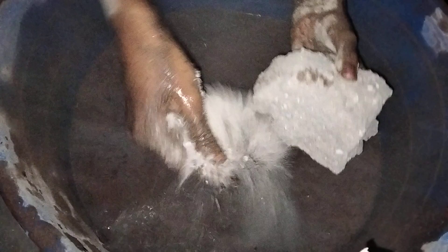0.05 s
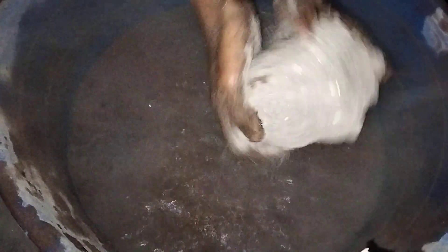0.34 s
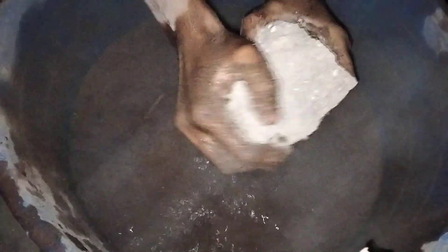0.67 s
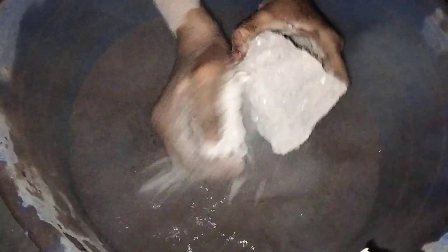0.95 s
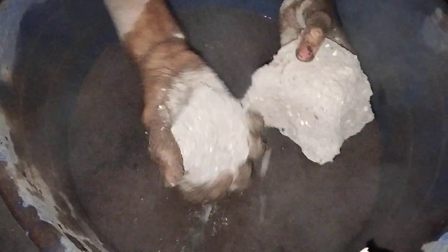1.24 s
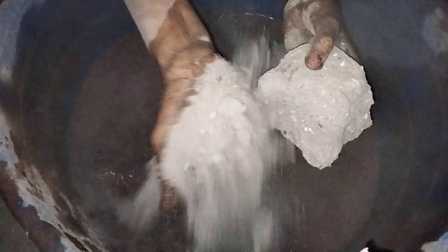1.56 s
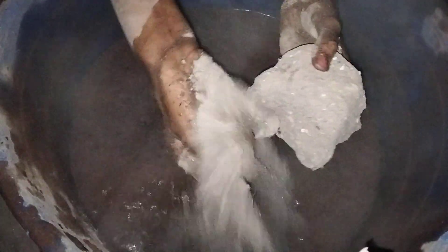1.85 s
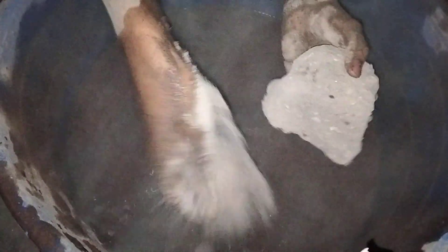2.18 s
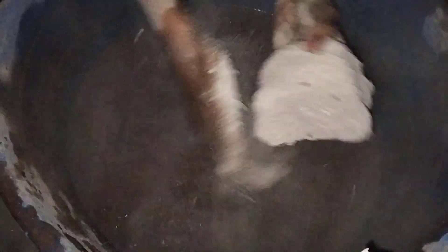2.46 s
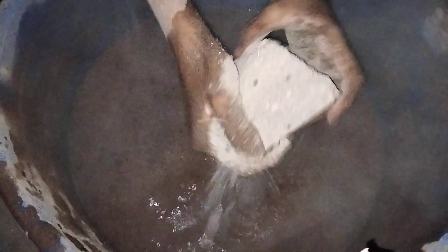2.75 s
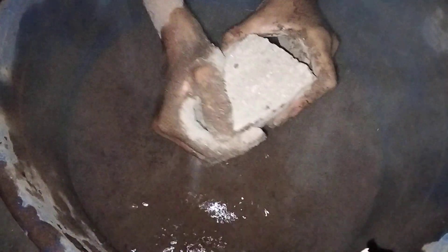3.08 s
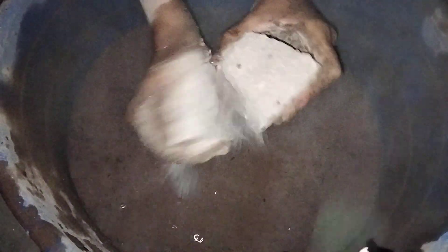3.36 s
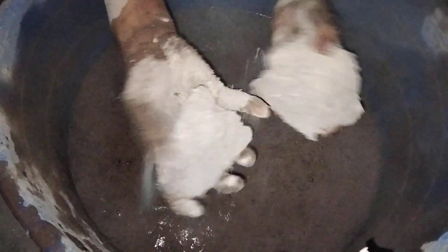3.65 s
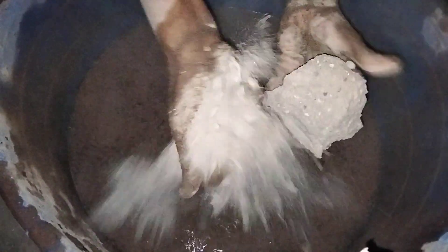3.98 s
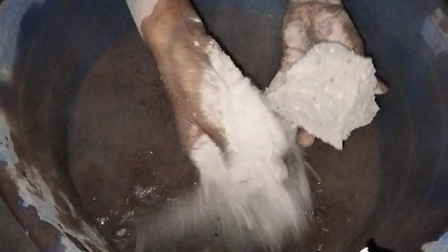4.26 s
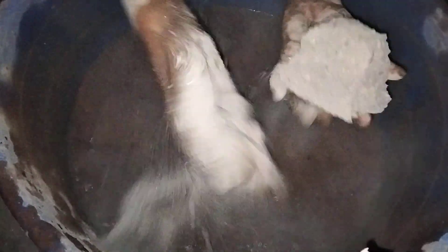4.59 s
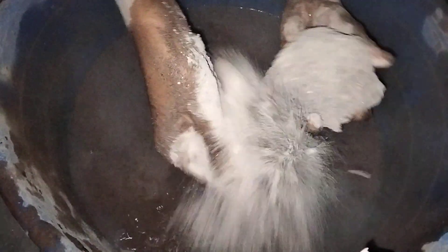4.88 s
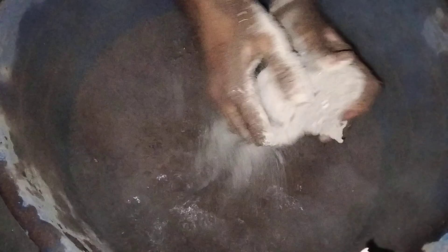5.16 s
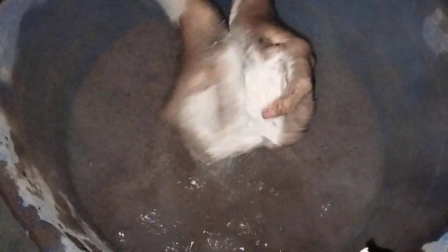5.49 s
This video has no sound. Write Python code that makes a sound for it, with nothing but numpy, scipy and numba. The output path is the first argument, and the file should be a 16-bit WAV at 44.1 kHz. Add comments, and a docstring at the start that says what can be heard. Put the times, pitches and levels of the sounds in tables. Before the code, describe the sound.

A hand crumbles a dry chunk of sand and cement over a plastic tub with a little water in it, close to the microphone. It opens with gritty crunches and falling crumbs for half a second. Fingers then rasp softly over the chunk, and a very faint, distant tone wavers around 0.7 to 1 second. From about 1.2 to 2.5 seconds comes dense crackling with bright snaps and a powdery hiss. Sand patters into the wet tub, lumps land with ticks and short plinks, and handfuls thud softly, ringing the hollow, most clearly near 1.6 seconds. Quieter rubbing and stray crumbs follow until 3.6 seconds. Another long round of crushing and spilling runs to about 5.1 seconds, with a soft thud near 4.8. Light rubbing and a few last plinks close it by 5.6 seconds. A steady low rumble lies underneath throughout.

```python
"""A dense, dry crackle, close to the microphone: a hand crushes a chunk of sand and cement over a
plastic tub with a little water in it. Grain bonds break and fingers rasp over the chunk. Sand patters
into the wet tub, lumps land with a tick and a short plink of trapped air, and handfuls thud on the
bottom, all ringing the tub's hollow. A low rumble lies underneath, with one faint, far, wavering tone."""
import sys
import numpy as np
from scipy import signal
from scipy.fft import rfft, irfft
from scipy.io import wavfile
from scipy.ndimage import uniform_filter1d
from numba import njit

SR = 44100
rng = np.random.default_rng(int(sys.argv[2]) if len(sys.argv) > 2 else 0)


def put_to_file(sound):
    """Save the sound as 16-bit audio at rate SR, in the file named by the first command-line argument."""
    columns = np.atleast_2d(sound).T  # one column per channel
    safe = np.clip(columns, -1, 1)
    whole_steps = np.round(safe * 32767)
    wavfile.write(sys.argv[1], SR, whole_steps.astype(np.int16))


N = 248283
TIME = np.arange(N) / SR
TOP_HZ = 15700
RUB_RELEASE_DB_PER_S = 429

# fingers rubbing the chunk as they shift their grip: start_s, length_s, level_db
FINGER_RUBS = [(.565, 0.098, -53.5), (.74, 0.03, -45), (.818, 0.01, -47.5), (.85, 0.074, -47.5),
               (.95, 0.064, -52), (1.15, 0.11, -51), (2.65, 0.076, -55.5), (2.74, 0.025, -47.5),
               (3.0, 0.016, -49.5), (3.192, 0.021, -47.5), (3.3, 0.077, -48.5), (3.385, 0.069, -48.5),
               (3.46, 0.22, -55.5), (4.15, 0.045, -43), (4.58, 0.11, -48.5), (5.12, 0.057, -54.5),
               (5.2, 0.046, -51), (5.312, 0.025, -49), (5.375, 0.024, -44), (5.42, 0.029, -51),
               (5.53, 0.082, -52.5)]
# spectrum of sand striking the wet plastic: frequency_hz, level_db
SAND_SPECTRUM = [(100, -28.5), (300, -4.5), (480, 0.5), (620, 3), (930, -5), (1350, 1.5), (1800, -9),
                 (3000, -3), (8000, -25)]


def crumbling(crush_db, count=15000, low_hz=1200, ring_s=0.0025, bonds_db=-2, powder_db=-10):
    """Each grain that breaks loose pings at its own pitch; bonds crackle and the powder hisses."""
    # spectrum of the breaking grit: frequency_hz, level_db
    grit_spectrum = [(200, 8.5), (600, -7), (1500, -8.5), (2300, 3.5), (3000, 5.5), (3900, 5.5), (4700, -1),
                     (7000, -3.5), (9000, -1), (11000, 1), (12500, -5.5), (15000, -16.5)]
    when, pitch, length = rng.random((count, 3)).T
    hz = low_hz + (TOP_HZ - low_hz) * pitch
    size = undb(6 * np.minimum(rng.standard_normal(count), 2.5))
    pings = unit(plinks(when * N / SR, hz, ring_s * hz * (0.55 + length), size, rise=0.))
    breaks_per_s = 2600 * undb(0.71 * (crush_db - crush_db.mean()))  # faster under a harder squeeze
    bonds = unit(shower(breaks_per_s, spread_db=5.1))
    powder = rng.standard_normal(N)
    grains = pings + undb(bonds_db) * bonds + undb(powder_db) * powder
    grit = through(grains * slips(), click(grit_spectrum))
    return unit(grit, band_hz=(5000, 15000)) * undb(crush_db)


def hand(fall_s=0.0029, rub_spill_db=-9.5, idle_grit_db=-79, idle_sand_db=-64.5):
    """The fist crumbles the chunk and spills sand: the levels of both over time, in dB."""
    # squeezes of the fist: start_s, length_s, crush_db, land_db
    squeezes = [(-.01, 0.031, -40.5, -40.5), (0.156, 0.078, -43.5, -44.5), (0.376, 0.051, -50, -50),
                (1.255, 0.077, -43, -46), (1.362, 0.095, -44.5, -42.5), (1.483, 0.12, -41, -39.5),
                (1.7, 0.25, -45.5, -44.5), (1.886, 0.17, -45.5, -46), (2.1, 0.13, -45, -42.5),
                (2.216, 0.0076, -38.5, -34), (2.341, 0.14, -46.5, -50), (3.621, 0.005, -49, -40.5),
                (3.647, 0.22, -42.5, -48.5), (3.86, 0.074, -51, -48.5), (3.946, 0.085, -40.5, -44.5),
                (4.186, 0.18, -42, -40.5), (4.409, 0.055, -41.5, -40.5), (4.673, 0.13, -46, -43.5),
                (4.857, 0.16, -49, -48.5)]
    start, length, crush_db, land_db = np.transpose(squeezes)
    rubbing = strokes(FINGER_RUBS, RUB_RELEASE_DB_PER_S)
    crushing = strokes(zip(start, length, crush_db), release_db_per_s=125.5)
    sifting = strokes(zip(start, length, crush_db - 3), release_db_per_s=27.5)  # powder lingers
    landing = strokes(zip(start + fall_s, length, land_db), release_db_per_s=105)
    grit = crushing + crunches() + sifting + rubbing + undb(idle_grit_db) ** 2
    sand = landing + rubbing * undb(rub_spill_db) ** 2 + undb(idle_sand_db) ** 2
    return 10 * np.log10(grit), 10 * np.log10(sand)


def strokes(rows, release_db_per_s, attack_s=0.001, build_share=0.27, sag_db_per_s=16, brief_s=0.06):
    """Power of hand strokes: each swells with the pressure, sags as the piece gives way and dies off."""
    power = 0
    for start, length, db in rows:
        age = np.maximum(TIME - start, 0)
        swell = np.minimum(age / (attack_s + build_share * length), 1)
        haste = max(brief_s / length, 1)  # brief strokes die off faster
        lost_db = sag_db_per_s * age + release_db_per_s * np.maximum(age - length, 0) * haste
        power = power + (swell * undb(db - lost_db)) ** 2
    return power


def crunches(hold_s=0.001, decay_db_per_s=1113):
    """Power of grain patches giving way at once: a sudden start, a short hold, a quick decay."""
    # collapsing patches: start_s, level_db
    patches = [(.002, -40), (0.237, -35), (0.956, -48), (1.125, -43), (1.171, -43), (1.276, -35),
               (1.300, -37.5), (1.426, -42), (1.465, -35.5), (1.831, -36), (2.78, -42.5), (3.029, -49.5),
               (3.22, -46), (3.33, -44), (3.713, -57), (3.781, -35), (3.962, -46), (4.009, -39),
               (4.221, -45), (4.268, -53), (4.298, -41), (4.406, -37), (4.505, -36), (4.895, -47),
               (5.021, -38.5), (5.065, -40.5)]
    power = 0
    for start, db in patches:
        lost_db = decay_db_per_s * np.maximum(TIME - start - hold_s, 0)
        power = power + (TIME >= start) * undb(db - lost_db) ** 2
    return power


def snaps(crack_db=-7.5, ping_db=-4.5, ring_s=0.0024):
    """Larger bonds give way with a bright crack, and the loosened chip pings."""
    # dry snaps of the chunk: start_s, level_db, pitch_hz
    breaks = [(0.06, -9.5, 9450), (0.2702, -6.5, 7700), (0.4645, -16.5, 3300), (0.51, -16, 2770),
              (.5878, -19.5, 2780), (0.9055, -19, 3584), (0.9747, -22, 6800), (1.1261, -18.5, 3450),
              (1.6374, -14, 7200), (1.6646, -9.5, 4600), (1.6921, -10.5, 8500), (1.7841, -10, 3860),
              (2.073, -17.5, 8300), (2.223, -7, 3800), (2.233, -7, 2430), (2.2896, -14, 7950),
              (2.3152, -10.5, 3700), (2.3209, -9.5, 6000), (2.3502, -13, 10800), (2.5543, -16.5, 6100),
              (2.8173, -21.5, 10000), (3.584, -26, 10900), (3.694, -17, 10700), (3.9105, -16, 3980),
              (4.0802, -11, 4000), (4.1121, -15.5, 3650), (4.1691, -15, 10150), (4.3296, -14, 9400),
              (4.424, -7.5, 10700), (4.4872, -7, 3300), (4.5118, -14.5, 7040), (4.631, -18.5, 3300),
              (4.663, -12, 11500), (4.768, -13, 9800), (4.95, -20, 6140), (4.9732, -16, 6900),
              (5.0385, -20.5, 3510)]
    # spectrum of a crack: frequency_hz, level_db
    crack_spectrum = [(200, -17), (1000, 11), (3500, 11), (5000, 14), (7500, 11), (11000, 18), (13000, 2.5),
                      (15500, -2)]
    when, db, hz = np.transpose(breaks)
    crack = through(shatter(when, db + crack_db, debris_db=-19, t60=0.025), click(crack_spectrum))
    return crack + plinks(when, hz, ring_s * hz, undb(db + ping_db), rise=0.)


def rasp(band_hz=(2900, 3800), gain_db=-6):
    """Skin dragged over the grains sticks and slips in a soft, narrow rasp."""
    band = signal.butter(2, band_hz, "band", fs=SR)
    drag = unit(signal.lfilter(*band, shower(5000, spread_db=3)) * slips())
    return drag * np.sqrt(strokes(FINGER_RUBS, RUB_RELEASE_DB_PER_S)) * undb(gain_db)


def lumps(plink_db=5.5, knock_db=-15, crumb_db=-6, crumbs=3, scatter_s=0.012):
    """A lump slaps and knocks the wet bottom and traps a pocket of air; its crumbs plink around it."""
    # lumps landing in the tub: start_s, tick_db, pitch_hz, ring_db
    landings = [(.0296, -29, 2200, -31), (.082, -23, 1970, -35.5), (0.139, -21, 2070, -35),
                (0.1755, -16.5, 2650, -36), (.2612, -24, 1520, -30), (0.2703, -7, 1090, -28),
                (0.3365, -13.5, 2800, -36.5), (.4205, -38, 1750, -32), (.424, -40, 1070, -39.5),
                (0.4485, -24, 1500, -37.5), (0.9746, -13.5, 1480, -38), (1.1271, -44, 3210, -40),
                (1.33, -42, 2880, -32.5), (1.3855, -27, 940, -35.5), (1.5192, -7.5, 3670, -26.5),
                (1.533, -20, 925, -23.5), (1.6922, -19, 654, -36.5), (1.708, -16, 1370, -29),
                (1.723, -29, 1310, -34), (1.7654, -19, 910, -33), (1.8372, -20, 960, -32.5),
                (1.8642, -16.5, 565, -35.5), (1.877, -48, 895, -30.5), (1.9487, -7, 928, -24.5),
                (1.99, -16.5, 1910, -32.5), (2.023, -26, 2950, -33), (2.028, -43, 856, -29.5),
                (2.066, -34, 1110, -36), (2.174, -24, 1010, -37.5), (2.2075, -7.5, 1214, -20),
                (2.2086, -49, 923, -22), (2.229, -10.5, 1224, -26), (2.2702, -23, 1300, -33),
                (2.3215, -18.5, 2010, -31.5), (2.3494, -20.5, 945, -30.5), (2.3643, -12.5, 900, -31.5),
                (2.4105, -21, 3250, -34), (2.433, -25, 2520, -35.5), (2.466, -28, 2720, -38),
                (2.494, -26, 1880, -38.5), (2.5547, -30, 1710, -47), (2.711, -24, 2300, -36),
                (2.7848, -21, 940, -45.5), (2.8657, -23.5, 1640, -35), (3.032, -32, 1930, -45.5),
                (3.4023, -21.5, 2420, -35.5), (3.565, -32, 2870, -42.5), (3.6326, -17.5, 650, -37.5),
                (3.6601, -22, 2830, -32), (3.94, -45, 940, -29), (3.9977, -24, 1510, -29.5),
                (4.014, -32, 1500, -34), (4.0257, -12, 1470, -31.5), (4.0793, -15, 1540, -33.5),
                (4.125, -23, 800, -30), (4.431, -12.5, 1140, -29.5), (4.467, -17, 905, -31.5),
                (4.509, -26, 1040, -41), (4.535, -24, 1250, -37.5), (4.606, -27, 1640, -41.5),
                (4.696, -31, 1570, -36.5), (4.739, -21, 1005, -30.5), (4.7768, -9, 620, -25.5),
                (4.7884, -17, 1260, -29.5), (4.811, -24, 1400, -39), (4.8722, -18, 1046, -29.5),
                (4.9791, -17.5, 1800, -37.5), (5.0695, -19.5, 1890, -34), (5.222, -43, 1510, -41.5),
                (5.314, -13.5, 1230, -29), (5.345, -22, 2820, -34), (5.3595, -30, 1880, -43),
                (5.3882, -21, 1090, -47)]
    # spectrum of the slap: frequency_hz, level_db
    tick_spectrum = [(150, -20), (600, -16), (1000, -5), (1600, 5.5), (3600, 7.5), (5200, 0), (8000, -4.5),
                     (11000, 1), (15500, -11)]
    when, tick_db, hz, ring_db = np.transpose(landings)
    firm = undb(0.3 * np.minimum(tick_db + 15, 0))  # small lumps collapse softly
    slap = shatter(when, tick_db - 1, debris_db=-17.5, t60=0.016, firm=firm)
    knock = shatter(when, ring_db + knock_db, debris_db=-1.5, t60=0.03, firm=firm)
    cycles = 28.5 * (hz / 1500) ** 0.8
    pockets = plinks(when, hz, cycles, undb(ring_db + plink_db), rise=0.0088)
    out = through(slap, click(tick_spectrum)) + pockets + through(knock, click(SAND_SPECTRUM))
    for late, pitch in rng.random((len(when), crumbs, 2)).transpose(1, 2, 0):
        crumb_hz = hz * (.75 + 1.1 * pitch)
        out += plinks(when + scatter_s * late, crumb_hz, cycles / 2, undb(ring_db + crumb_db), rise=.03)
    return out


def patter(land_db, count=3400, low_hz=850, high_hz=3900, ring_s=0.013):
    """Crumbs hit the shallow water in uneven clumps, each with a tiny plink of its own pitch."""
    when, pitch, length, weight = rng.random((count, 4)).T
    hz = low_hz * (high_hz / low_hz) ** pitch
    size = undb(5 * np.minimum(-np.log(weight), 3)) * (hz / low_hz) ** 0.32
    drops = plinks(when * N / SR, hz, ring_s * hz * (.5 + length), size, rise=0.028)
    return unit(drops * slips()) * undb(land_db)


def sandfall(land_db, grains_per_s=1100, gain_db=-5):
    """The falling sand drums softly on the wet plastic."""
    drumming = unit(through(shower(grains_per_s, spread_db=5), click(SAND_SPECTRUM)))
    heavy = undb(0.14 * (land_db - land_db.max()))  # thin trickles barely stir it
    return drumming * undb(land_db + gain_db) * heavy


def thuds(gain_db=-11):
    """A handful lands softly; the broader it is, the deeper it shakes the bottom."""
    # handfuls hitting the bottom: start_s, level_db, lowest_hz
    handfuls = [(1.583, -17.5, 500), (1.594, -16.5, 235), (1.601, -21, 430), (2.206, -31, 440),
                (2.352, -24.5, 350), (3.94, -22, 201), (3.951, -24, 110), (4.771, -16.5, 550),
                (5.314, -25.5, 506)]
    # modes of the tub's bottom: pitch_hz, level_db, t60_s
    bottom_modes = [(117, -3, 0.12), (171, -5.5, 0.2), (271, -3, 0.035), (330, 4.5, 0.012),
                    (437, -15.5, 0.017), (560, -12, 0.036), (860, 0, 0.0076)]
    push = 0
    for when, db, lowest_hz in handfuls:
        blow = shatter([when], [db + gain_db], debris_db=-20, t60=0.046)
        push = push + signal.lfilter(*signal.butter(2, lowest_hz, "high", fs=SR), blow)
    bottom = sum(undb(db) * fade(t60) * np.sin(2 * np.pi * hz * TIME[:SR // 4])
                 for hz, db, t60 in bottom_modes)
    return through(push, bottom)


def hollow(x, lowest_hz=85):
    """The close sounds ring the air in the tub; the deep bass escapes."""
    # air resonances, relative to the direct sound: centre_hz, width_hz, level_db
    air_modes = [(615.4, 49, 3.5), (910, 64, 1.5), (1223, 30, -12), (1360, 88, -5.5), (1800, 250, -11.5)]
    hz = np.maximum(np.arange(N // 2 + 1) * SR / N, 1)
    ring = sum(undb(db) / (1 + 1j * (hz - centre ** 2 / hz) / width) for centre, width, db in air_modes)
    ringing = irfft(rfft(x) * (1 + ring), N)
    return signal.lfilter(*signal.butter(2, lowest_hz, "high", fs=SR), ringing)


def walls(x, tub_db=-13, room_db=-19, dull_hz=4500, delay_s=0.001409):
    """Quick reflections from the tub and a faint, dull room tail follow the direct sound."""
    echo = undb(tub_db) * tail(t60=0.022) + undb(room_db) * tail(t60=0.045)
    echo = signal.lfilter(*signal.butter(1, dull_hz, fs=SR), echo)
    return x + through(x, np.concatenate([np.zeros(int(delay_s * SR)), echo]))


def surroundings(rumble_db=-50.5, waver=0.032):
    """Steady low rumble with one faint wavering tone, blurred by distance."""
    # spectrum of the rumble: frequency_hz, level_db
    rumble_spectrum = [(20, -13), (40, -6.5), (70, -1.5), (115, 3), (165, 4.5), (220, -4), (330, -9.5),
                       (600, -15.5), (1200, -26), (3000, -27), (4000, -18), (5000, -29), (8000, -27.5),
                       (11000, -21), (15000, -32)]
    # course of the far tone: time_s, pitch_hz, level_db
    far_tone = [(.6, 433, -86), (.67, 430.6, -60), (.71, 488, -51.5), (.76, 419.6, -61), (.85, 435, -57),
                (.92, 482, -53.5), (.97, 453, -57), (1.03, 418, -59), (1.15, 409, -79)]
    rumble = unit(through(rng.standard_normal(N), click(rumble_spectrum)))
    when, hz, db = np.transpose(far_tone)
    drift = unit(uniform_filter1d(rng.standard_normal(N), SR // 100))
    phase = 2 * np.pi * np.cumsum(np.interp(TIME, when, hz) * (1 + waver * drift)) / SR
    tone = np.sin(phase) * slips() * np.interp(TIME, when, undb(db), left=0, right=0)
    return undb(rumble_db) * rumble + through(tone, tail(t60=0.2))


@njit
def plinks(start, hz, cycles, size, rise):
    """Damped sines that swell in one cycle; with rise, the pitch climbs like an air pocket's in water."""
    out = np.zeros(N)
    for k in range(len(start)):
        first, length, phase = int(start[k] * SR), int(cycles[k] / hz[k] * SR), 0.
        for i in range(min(length, N - first)):
            phase += 2 * np.pi * hz[k] / SR * (1 + rise * (i / length - .15))
            swell = min(phase / (2 * np.pi), 1.)
            out[first + i] += size[k] * swell * np.exp(-6.9 * i / length) * np.sin(phase)
    return out


def shatter(times, db, debris_db, t60, firm=1):
    """Pushes, each trailed by a brief spray of fragments; the less firm, the weaker the push."""
    push = blows(times, undb(db) * firm)
    spray = through(blows(times, undb(db)), fade(t60))
    return push + undb(debris_db) * spray * unit(shower(14000, spread_db=2.04))


def blows(times, sizes):
    """Single pushes at the given times."""
    return np.bincount((np.asarray(times) * SR).astype(int), sizes, N)[:N]


def shower(per_s, spread_db):
    """Random impacts, many small and a few large, of steady mean power."""
    size = undb(spread_db * np.minimum(rng.standard_normal(N), 2)) * rng.choice([-1, 1], N)
    return size * (rng.random(N) < per_s / SR) / np.sqrt(per_s)


def slips(depth_db=3.0, per_s=150):
    """A gain that flickers unevenly, as when the chunk gives way."""
    knots = rng.standard_normal(N // 50)
    return undb(depth_db * np.interp(TIME * per_s, np.arange(len(knots)), knots))


def click(spectrum, size=2048):
    """Causal pulse of peak 1, shaped by (frequency_hz, level_db) points."""
    hz, db = np.transpose(spectrum)
    grid = np.maximum(np.arange(size // 2 + 1) * SR / size, 1)
    gain = undb(np.interp(np.log(grid), np.log(hz), db))
    cepstrum = irfft(np.log(gain))
    causal = 2 * cepstrum[:size // 2] * (np.arange(size // 2) > 0)
    pulse = irfft(np.exp(rfft(causal, size)))
    return pulse / abs(pulse).max()


def tail(t60):
    """Diffuse reflections: decaying noise of unit energy."""
    noise = fade(t60) * rng.standard_normal(SR // 4)
    return noise / np.linalg.norm(noise)


def fade(t60):
    """A quarter second of decay, falling 60 dB in t60 seconds."""
    return np.exp(-np.log(1000) * TIME[:SR // 4] / t60)


def through(x, response):
    """Pass a sound through an impulse response."""
    return signal.fftconvolve(x, response)[:N]


def unit(x, band_hz=(0, SR / 2)):
    """Scale to rms 1 inside a band."""
    hz = np.arange(len(x) // 2 + 1) * SR / len(x)
    inside = rfft(x)[(hz >= band_hz[0]) & (hz <= band_hz[1])]
    return x * len(x) / np.sqrt(2 * np.sum(abs(inside) ** 2))


def undb(db):
    """Decibels to gain."""
    return 10 ** (np.asarray(db) / 20)


def scene():
    """One microphone close to the tub: crushing above, landing below, the rumble behind."""
    crush_db, land_db = hand()
    above = crumbling(crush_db) + rasp() + snaps()
    below = patter(land_db) + sandfall(land_db) + lumps() + thuds()
    return (walls(hollow(above + below)) + surroundings())[None]


def record(dry):
    """A steep low-pass cuts the highest treble."""
    return signal.sosfilt(signal.ellip(8, .2, 70, TOP_HZ, fs=SR, output="sos"), dry)


dry = scene()
out = record(dry)
put_to_file(out)
```